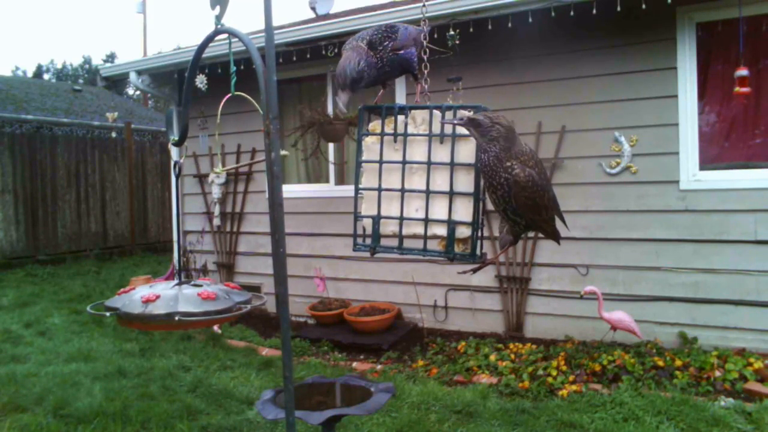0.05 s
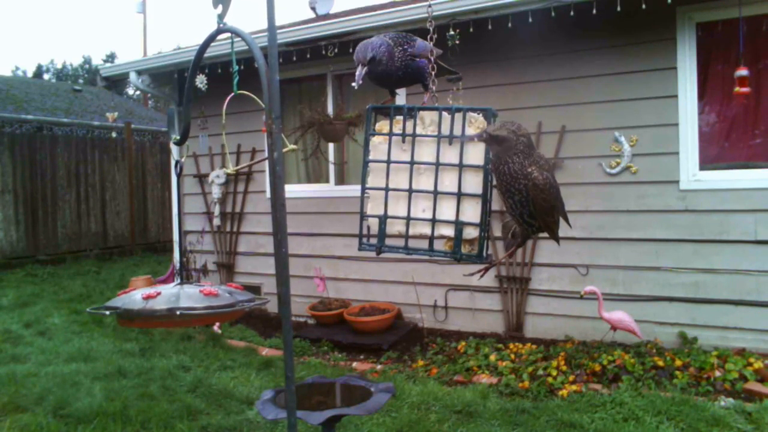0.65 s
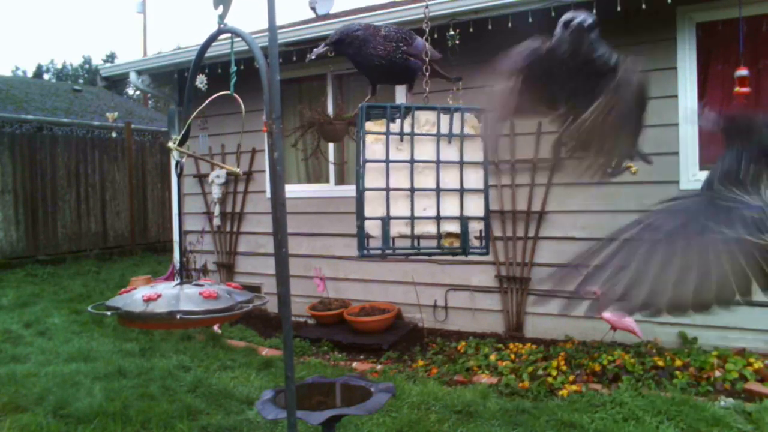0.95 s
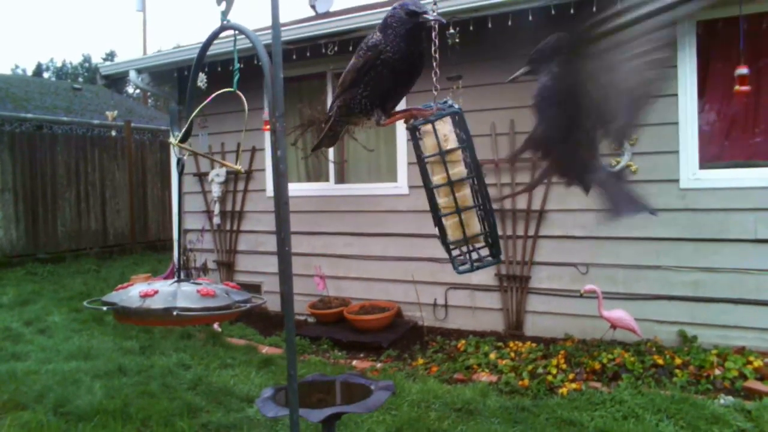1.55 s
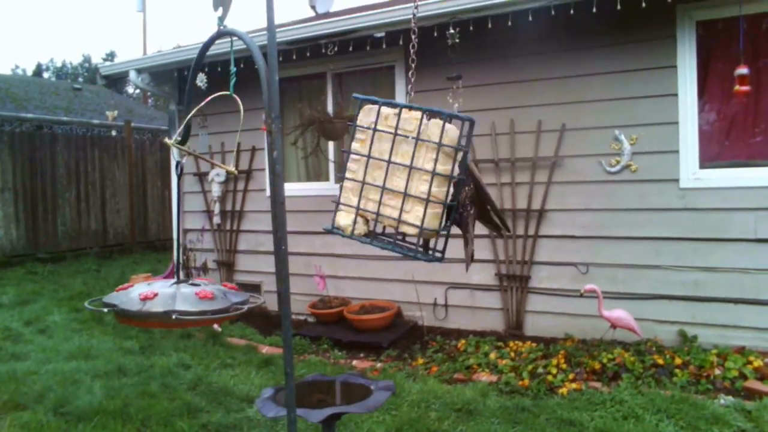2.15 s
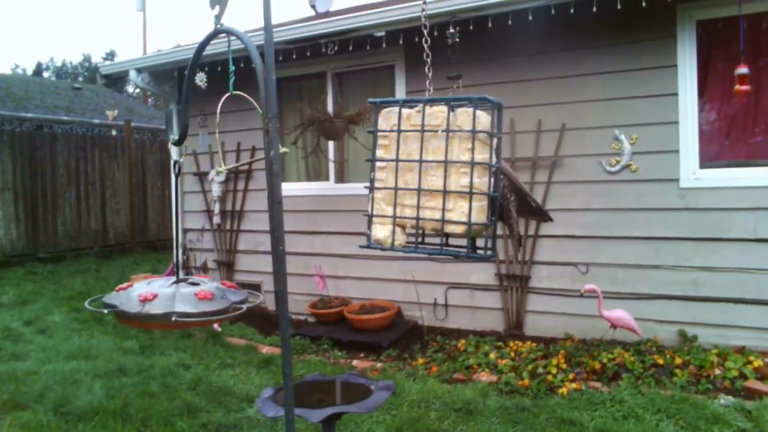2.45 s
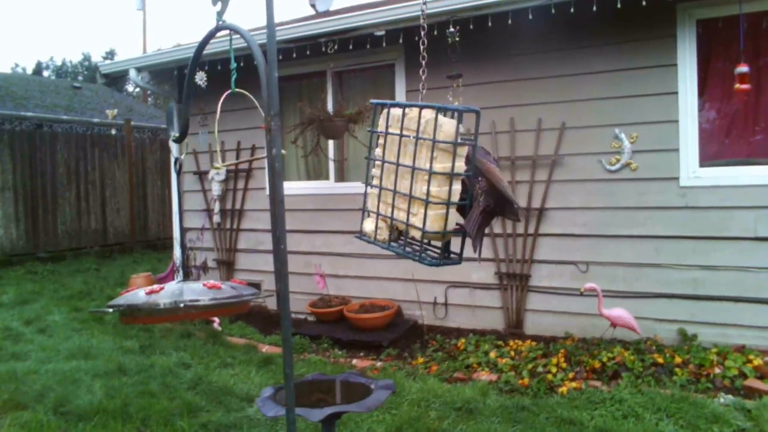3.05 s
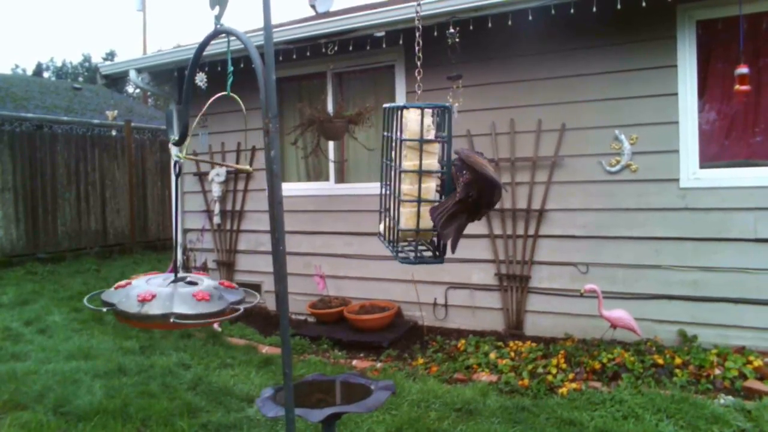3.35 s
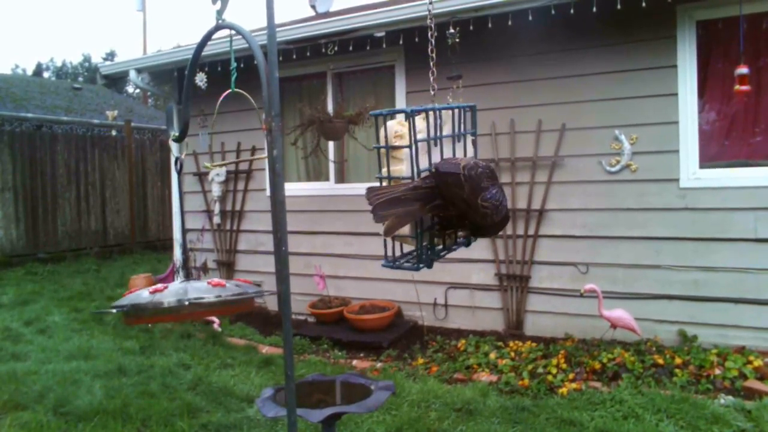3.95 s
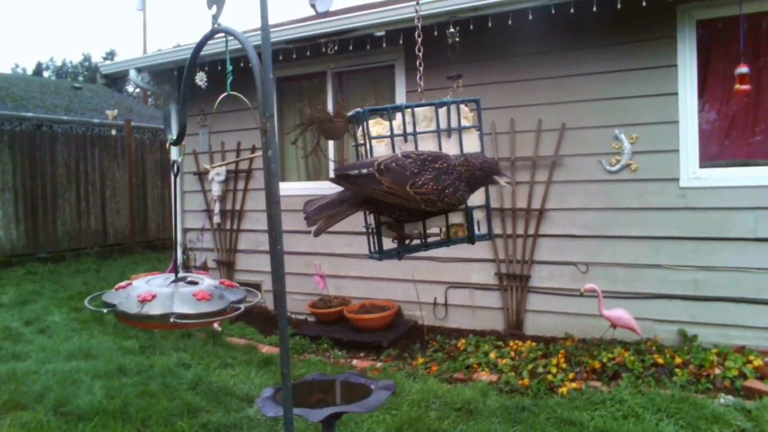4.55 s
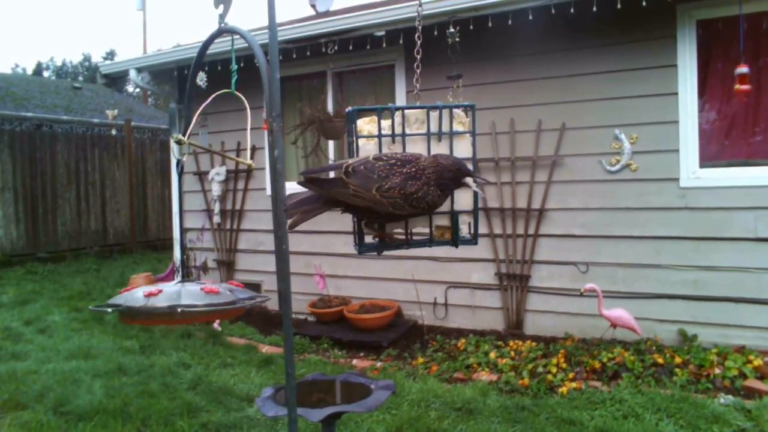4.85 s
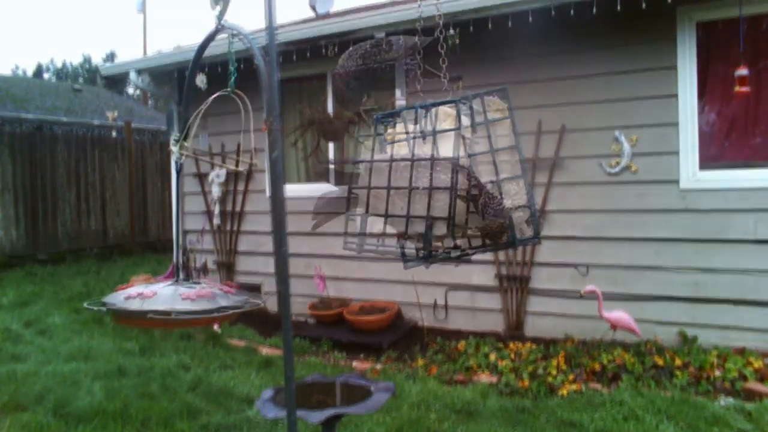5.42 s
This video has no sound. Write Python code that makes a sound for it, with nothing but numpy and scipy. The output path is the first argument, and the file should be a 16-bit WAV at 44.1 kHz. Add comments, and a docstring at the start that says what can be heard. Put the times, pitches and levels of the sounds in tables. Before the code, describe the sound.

A dull hum and faint hiss fill a garden. At about 0.5 seconds a starling close by gives a raspy, warbling squeal, rising into two louder short ones around 1 second, with flapping and taps on a wire feeder. At 1.1 seconds wings thump air against the microphone, followed by a loud clack, claw scrapes and another hoarse squeal at 1.3. A sharp knock and scrape come near 1.9 seconds, then more flapping and a second heavy gust at 2.3. Claws tick lightly on the wire around 2.6. Small wings whirr softly near 3 seconds. From 3.2 to 3.8 a bird slightly farther off gives six sharp, falling chips with a little echo, and one more at 4.3, among light ticks and taps. Feathers rustle faintly near 5 seconds, and a last knock and scrape sound at about 5.5 as the background fades.

```python
"""A garden by a house wall, where starlings squabble at a hanging wire suet cage near a small camera.
Their squeals are whistles under fast frequency modulation, with a rasp of turbulent air. Beaks and
claws knock and scrape, exciting the modes of the cage, and tick on its wire; wings rustle and shed
vortices onto the microphone. Later small wings whirr, and a bird's sharp falling chips reflect
off the wall. A dull hum and a faint hiss lie under it all."""
import sys
import numpy as np
from scipy import signal
from scipy.fft import rfft, irfft, next_fast_len
from scipy.io import wavfile
from scipy.ndimage import uniform_filter1d

SR = 44100
rng = np.random.default_rng(int(sys.argv[2]) if len(sys.argv) > 2 else 0)


def file_out(sig):
    """Save sig as 16-bit WAV at sys.argv[1]."""
    # one column per channel
    cols = np.atleast_2d(sig).T
    # limit, then scale
    lim = np.clip(cols, -1, 1)
    pcm = np.round(lim * 32767).astype(np.int16)
    wavfile.write(sys.argv[1], SR, pcm)


N = 246078
T = np.arange(N) / SR


def from_db(db):
    """Amplitude ratio of a level in decibels."""
    return 10 ** (np.asarray(db) / 20)


def rms_one(x):
    """Normalisation to unit power."""
    return x / np.sqrt(np.mean(x ** 2) + 1e-20)


def butter(x, hz, kind="low", order=2):
    """Causal Butterworth low- or high-pass."""
    return signal.sosfilt(signal.butter(order, min(hz, .45 * SR), kind, fs=SR, output="sos"), x + 1e-18)


def noise(spectrum):
    """Spectral shaping of white noise by rows of (f/Hz, level/dB); unit power."""
    hz, db = np.transpose(spectrum)
    size = next_fast_len(N)
    f = np.arange(size // 2 + 1) * SR / size
    gain = from_db(np.interp(np.log(f + 1e-3), np.log(hz), db)) * (f < hz[-1]) * (f > hz[0] / 2)
    return rms_one(irfft(rfft(rng.standard_normal(size)) * gain, size)[:N])


def drift(hz):
    """Random modulation: low-passed noise of unit power."""
    return rms_one(butter(rng.standard_normal(N), hz))


def contact(size, bright_hz, low_hz):
    """Friction noise: micro-slips fill a band, their short-term power held even."""
    slips = butter(butter(rng.standard_normal(size), bright_hz), low_hz, "high")
    return slips / np.sqrt(uniform_filter1d(slips ** 2, size=SR // 700) + 1e-12)


def add(out, s, sound):
    """Superposition of a short sound, starting at time s."""
    at = max(round(s * SR), 0)
    out[at:at + len(sound)] += sound[:max(N - at, 0)]


def rubs(rows):
    """Sliding friction: bursts of contact noise under Gaussian envelopes."""
    out, t = np.zeros(N), T[:SR // 5] - .1
    for s, half_s, level_db, bright_hz, low_hz in rows:
        envelope = from_db(level_db) * np.exp(-(t / half_s) ** 2)
        add(out, s + t[0], envelope * contact(len(t), bright_hz, low_hz))
    return out


def wall(x, echo_db, scatter_db, delay_s=0.026, decay_s=0.025):
    """Reflection and scattering: one echo from the house wall, a diffuse tail from fence and ground."""
    t = T[:SR // 4]
    tail = rng.standard_normal(len(t)) * np.exp(-t / decay_s)
    scattered = signal.fftconvolve(x, tail / np.sqrt(np.sum(tail ** 2)))[:N]
    return x + from_db(echo_db) * np.interp(T - delay_s, T, x) + from_db(scatter_db) * scattered


# Spectrum of the garden hum: f/Hz, relative level/dB
HUM_SPECTRUM = [(15, -30.5), (25, -5), (86, -9.5), (174, -16), (195, -15), (256, -19.5), (335, -22.5),
                (392, -20.5), (429, -20.5), (470, -24.5), (630, -20.5), (1080, -22.5), (2040, -41.5),
                (5500, -58), (7150, -83), (12100, -120)]

def garden(hum_db=-44.5, hiss_db=-57.5):
    """Stationary ambient noise: a dull hum and a faint hiss."""
    hum = from_db(hum_db) * noise(HUM_SPECTRUM)
    return hum + from_db(hiss_db) * rms_one(butter(rng.standard_normal(N), 4500))


# Spectra of moving air and of feathers: f/Hz, relative level/dB
DRAUGHT_SPECTRUM = [(15, -8), (28, 8.5), (60, -7.5), (110, -13), (220, -23.5), (500, -38.5), (1500, -65.5)]
FEATHER_SPECTRUM = [(150, -0.5), (500, 3), (1000, 1), (2000, 0), (3200, -5), (4500, 3), (5500, -2)]
# Flurries of wings: peak t/s, half length/s, draught level/dB, rustle level/dB
FLURRIES = [(0.43, 0.053, -62, -53.5), (.72, 0.22, -44, -49), (1.098, 0.41, -14, -40.5),
            (2.06, .19, -25.5, -46.5), (2.293, 0.17, -20, -61.5), (2.924, 0.41, -34.5, -54),
            (3.663, 0.26, -45.5, -65.5), (4.73, 0.069, -53.5, -60.5), (5.024, 0.096, -49.5, -58)]

def flurries(breeze_db=-58.5, reach=0.46, draught_gain_db=-1.5, rustle_gain_db=6.0, ruffle_db=4.0):
    """Friction and turbulence: feathers rustle through each flurry, moving air rumbles near its peak."""
    air, feathers = from_db(breeze_db), 0
    for s, half_s, draught_db, rustle_db in FLURRIES:
        away = np.abs(T - s) / half_s
        air = air + from_db(draught_db) * np.exp(-away / reach)
        feathers = feathers + from_db(rustle_db) * np.exp(-away ** 2)
    draught = air * from_db(draught_gain_db) * noise(DRAUGHT_SPECTRUM)
    rustle = feathers * from_db(rustle_gain_db + ruffle_db * drift(68)) * noise(FEATHER_SPECTRUM)
    return draught + rustle


def whirr(from_s=2.917, to_s=3.18, attack_s=0.075, release_s=0.048, beat_hz=41.7, level_db=-42):
    """Periodic forcing: small hovering wings hum at their beat rate, which also modulates their swish."""
    beat = np.cos(2 * np.pi * beat_hz * T)
    swish = from_db(1) * (1 + .5 * beat) * butter(noise(FEATHER_SPECTRUM), 3000, "high")
    envelope = np.exp(-np.maximum(from_s - T, 0) / attack_s - np.maximum(T - to_s, 0) / release_s)
    return from_db(level_db) * envelope * (np.sqrt(2) * beat + swish)


# Runs of wing flaps: first t/s, length/s, level/dB
FLAP_RUNS = [(.665, .4, -31.5), (1.365, .09, -26.5), (2.022, .15, -38.5)]

def flaps(period_s=.063, half_s=0.0065, bright_hz=1300, low_hz=250):
    """A periodic train of dull noise pulses: feathers slap the air and each other."""
    return rubs([(s, half_s, db, bright_hz, low_hz) for first_s, length_s, db in FLAP_RUNS
                 for s in np.arange(first_s, first_s + length_s, period_s)])


# Hard wing strokes: t/s, half length/s, level/dB, eddy f/Hz, lead of the air pushed ahead/s
HARD_STROKES = [(1.103, 0.0055, -2.5, 248.3, .031), (2.279, 0.006, -2.5, 242, .017)]

def gusts(bow_s=.008, bow_db=-10, bow_hz=51.6, lag_s=.015, wake_s=0.012, wake_db=-9, wake_hz=104.6):
    """Air displacement: a hard stroke makes three puffs, the bow of air ahead, the vortex and its wake."""
    puffs = []
    for s, half_s, db, hz, lead_s in HARD_STROKES:
        bow = (s - lead_s, bow_s, db + bow_db, bow_hz)
        wake = (s + lag_s, wake_s, db + wake_db, wake_hz)
        puffs += [bow, (s, half_s, db, hz), wake]
    return puffs


# Softer wing strokes: t/s, half length/s, level/dB, eddy f/Hz
SOFT_STROKES = [(1.238, 0.003, -8, 144), (2.08, .014, -19, 39.4), (2.13, 0.014, -24.5, 40.3)]

def buffets(wander=0.22, eddy_db=-3.0, eddy_reach=2.57, onset=2.9, release=1.02):
    """Vortex shedding: each stroke gives the microphone a sudden pressure swing with finer turbulence."""
    out, t = np.zeros(N), T[:SR // 5] - .1
    for s, half_s, level_db, hz in SOFT_STROKES + gusts():
        unsteady = rms_one(butter(rng.standard_normal(len(t)), hz, order=3))
        eddies = rms_one(butter(rng.standard_normal(len(t)), hz * eddy_reach, order=3))
        turns = np.cumsum(hz * (1 + wander * unsteady)) / SR
        swing = -np.sqrt(2) * np.cos(2 * np.pi * (turns - turns[len(t) // 2]))
        envelope = 1 / np.cosh(np.where(t < 0, onset, release) * t / half_s)
        add(out, s + t[0], from_db(level_db) * envelope * (swing + from_db(eddy_db) * eddies))
    return out


# Claw tips touching the wire: t/s, level/dB
TICKS = [(0.249, -49), (1.712, -26.5), (1.8267, -24), (2.6007, -23.5), (2.626, -17), (2.6623, -30),
         (2.7033, -25.5), (3.7399, -20.5), (3.9669, -26), (2.018, -24), (5.4302, -30)]

def ticks(gain_db=4.0, decay_s=0.00054, bright_hz=6000, edge_hz=3200):
    """Light impacts: so brief a contact has a spectrum that reaches far into the treble."""
    out, t = np.zeros(N), T[:SR // 100]
    for s, level_db in TICKS:
        envelope = from_db(level_db + gain_db) * np.exp(-t / decay_s)
        add(out, s, envelope * contact(len(t), bright_hz, edge_hz))
    return butter(out, edge_hz, "high", order=3)


# Claw scrapes: peak t/s, half length/s, level/dB, lower edge f/Hz
SCRAPES = [(1.21, 0.008, -24, 605), (1.245, 0.0065, -19.5, 400), (1.335, 0.0049, -20, 2470),
           (1.356, 0.003, -22, 2520), (1.922, 0.011, -15.5, 1020), (2.584, 0.0027, -38.5, 1200),
           (2.644, 0.0075, -38.5, 1190), (2.72, 0.014, -37.5, 1160), (5.057, 0.005, -37.5, 1210),
           (5.498, 0.0078, -20, 985)]

def scrapes(drag_db=-11, drag_hz=1900, slide_hz=8500, brightening=.22, grain_db=4.0):
    """Stick-slip friction: a claw drags dully, then slides fast; the harder the slide, the brighter."""
    drags, slides = [], []
    for s, half_s, db, low_hz in SCRAPES:
        drags.append((s - 1.9 * half_s, 2 * half_s, db + drag_db, drag_hz, low_hz))
        slides.append((s, half_s, db, slide_hz * from_db(brightening * db), low_hz))
    return rubs(drags + slides) * from_db(grain_db * drift(380))


# Hard knocks on the cage: t/s, level/dB, rattle decay/s, upper edge f/Hz, lower edge f/Hz
KNOCKS = [(0.854, -10.5, 0.0027, 2600, 197), (.884, -13, 0.0017, 2430, 300), (.924, -6, 0.00049, 5930, 795),
          (.96, -16, 0.0037, 4980, 499), (1.1616, 0, 0.0055, 4860, 409), (1.167, -2, .004, 5820, 400),
          (1.337, -12.5, 0.0012, 5900, 1500), (1.392, -14.5, 0.0026, 1890, 1000),
          (1.854, 3, 0.0016, 4400, 300), (4.087, -28.5, 0.0012, 1660, 1010),
          (4.1438, -19.5, 0.0089, 2620, 1238), (4.151, -18, 0.0066, 2036, 1237),
          (5.4516, -7, 0.0041, 1720, 745)]

def knocks(push_db=-8.0, push_s=0.00045, shudder_db=-24, shudder_s=.016):
    """Impulsive excitation: a brief push, a decaying rattle and a longer shudder of the cage."""
    force, t = np.zeros(N), T[:SR // 10]
    push = from_db(push_db) * t / push_s * np.exp(1 - t / push_s)
    for s, level_db, rattle_s, bright_hz, low_hz in KNOCKS:
        rattle = np.exp(-t / rattle_s) * contact(len(t), bright_hz, low_hz)
        shudder = np.exp(-t / shudder_s) * contact(len(t), bright_hz=1900, low_hz=680)
        add(force, s, from_db(level_db) * (push + rattle + from_db(shudder_db) * shudder))
    return force


# Normal modes of the feeder: f/Hz, level/dB, T60/s
FEEDER_MODES = [(195, -24, 0.23), (480, -16, 0.06), (770, -14.5, 0.025), (920, -13, 0.026),
                (1112, -16, 0.056), (1546, -12.5, 0.023), (1847, -14, 0.021), (2128, -13.5, 0.059),
                (2920, -27.5, 0.12), (3400, -22.5, 0.011), (3926, -13.5, 0.032), (4340, -4, 0.012),
                (4900, 2.5, 0.0079), (5090, -0.5, 0.0037)]

def feeder(force, direct_db=-2.5, ring_db=-27.0, hollow_hz=3000, hollow_q=5.8):
    """Modal resonance: contact force drives damped modes and is also heard directly, through a notch."""
    force = butter(force, 200, "high") + 1e-18
    out = from_db(direct_db) * signal.lfilter(*signal.iirnotch(hollow_hz, hollow_q, fs=SR), force)
    for hz, level_db, t60 in FEEDER_MODES:
        radius, angle = from_db(-60 / (t60 * SR)), 2 * np.pi * hz / SR
        pole_real = radius * np.cos(angle)
        ring = signal.lfilter([1, -pole_real], [1, -2 * pole_real, radius ** 2], force)
        out += from_db(level_db + ring_db) * ring
    return out


# Falling chips: t/s, level/dB, f/Hz after the plunge, length/s
CHIPS = [(3.221, -20, 1640, 0.0055), (3.4228, -27, 1685, 0.023), (3.5208, -25, 1735, 0.017),
         (3.612, -26.5, 1740, 0.013), (3.718, -26, 1780, 0.019), (3.8154, -26.5, 1794, 0.026),
         (4.315, -24, 2240, 0.013)]

def chips(start_hz=6000, fall_s=0.0043, sag_hz_per_s=13000, attack_s=.0024, fade_s=0.0022, held=0.28):
    """Frequency sweep: each chip plunges within milliseconds; harmonics grow as it settles and sags."""
    out, t = np.zeros(N), T[:SR // 16]
    shape = np.minimum(t / attack_s, 1) ** 2 * (held + np.exp(-np.maximum(t - attack_s, 0) / fade_s))
    for s, level_db, end_hz, length_s in CHIPS:
        plunge_hz = (start_hz - end_hz) * np.exp(-(t / fall_s) ** 1.59)
        hz = end_hz + plunge_hz - sag_hz_per_s * np.minimum(t, 2 * length_s)
        phase = 2 * np.pi * np.cumsum(hz) / SR
        overtones = from_db(-5) * np.sin(2 * phase) + from_db(-12) * np.sin(3 * phase)
        tone = np.sin(phase) + np.minimum(end_hz / hz, 1) * overtones
        add(out, s, from_db(level_db) * shape * np.exp(-(t / length_s) ** 3) * tone)
    return out


# Spectrum of the air in a squeal: f/Hz, relative level/dB
RASP_SPECTRUM = [(300, -25), (900, -20.5), (1300, -7), (1750, 2), (2500, 3), (3600, -10.5), (5500, -15.5)]
# Starling squeals: t/s, length/s, base f/Hz, arch height/Hz, time to its top/s, upward swing/Hz,
# initial warble rate/Hz, level/dB, swell over the call/dB, rasp level/dB
SQUEALS = [(-.03, 0.046, 2720, 4, .02, 250, 81, -41.5, -16, 0),
           (0.55, 0.36, 2093, 800, .125, 1251, 80.4, -28.5, 8, -2),
           (0.887, .09, 2265, -2, .045, 1987, 64, -21, 6, -15),
           (0.998, 0.051, 2615, 4, .03, 2010, 69, -17, 7.5, -13),
           (1.3, .194, 1991, 820, .095, 1055, 82, -24.5, -6, -1)]

def squeals(scoop_hz=448.8, scoop_s=0.022, arch_s=0.063, attack_s=0.0063, slowing=.33, jitter=0.028):
    """Frequency modulation: a rasping whistle is thrown upward some sixty times a second, unevenly."""
    out, waver = np.zeros(N), drift(350)
    flicker_db, rasp = 6 * np.tanh(drift(290)), noise(RASP_SPECTRUM)
    stumble, reach = .22 * drift(70), 1 + .2 * np.tanh(drift(90))   # warbles vary in timing and width
    for s, length_s, base_hz, arch_hz, top_s, swing_hz, rate_hz, call_db, swell_db, hoarse_db in SQUEALS:
        t = np.clip(T - s, 0, length_s)
        progress = t / length_s
        envelope = uniform_filter1d((progress < 1) * (1 - np.exp(-t / attack_s)), size=180)
        push_db = swell_db * (progress - .5)
        gain = from_db(call_db + push_db)
        arch = np.exp(-((t - top_s) / arch_s) ** 2)
        low_hz = base_hz - scoop_hz * np.exp(-t / scoop_s) + arch_hz * arch   # starts flat, then arches
        warble = np.pi * rate_hz * t * (1 - slowing * progress / 2) + stumble
        throw = 1 - np.abs(np.sin(warble)) ** .96   # round troughs, pointed tops
        hz = low_hz + swing_hz * from_db(.38 * push_db) * reach * throw   # wider when louder
        phase = 2 * np.pi * np.cumsum(hz * (1 + jitter * waver)) / SR
        strain = from_db(-4) * np.sqrt(gain)   # pushed harder, the tone turns harsh
        whistle = np.sqrt(2) * (np.sin(phase) + strain * np.sin(2 * phase))
        effort_db = -.5 - 4 * throw - 2 * np.sin(2 * warble)   # strongest as the pitch starts to rise
        rasp_db = hoarse_db - 10 * (1 - np.sin(np.pi * progress))   # hoarsest in mid-call
        voice = from_db(effort_db + flicker_db) * whistle + from_db(rasp_db) * rasp
        out += gain * envelope * voice
    return out


def scene(right_db=0.6, fade_from_s=5.01, fade_db_per_s=10):
    """Superposition: near sounds are almost dry and a little to the right; the farther chips echo more."""
    near = squeals() + feeder(scrapes() + knocks()) + ticks() + flaps()
    near = wall(near, echo_db=-37.5, scatter_db=-23.5)
    far = wall(chips(), echo_db=-15.0, scatter_db=-10.5)
    ambience, buffeting = garden(), buffets()
    background = ambience + flurries() + whirr()
    fade = from_db(-fade_db_per_s * np.maximum(T - fade_from_s, 0))
    pan = from_db(right_db * np.array([[-.5], [.5]]))
    return background * fade + buffeting + far + near * pan


def record(dry, step=4, overload=.94, soften_hz=11500, cutoff_hz=16000):
    """Spectral imaging: the camera overloads at a quarter rate; interpolation mirrors sound upward."""
    coarse = np.clip(butter(dry, 5800, order=8)[:, ::step], -overload, overload)
    joined = np.array([np.interp(np.arange(N), np.arange(0, N, step), side) for side in coarse])
    softened = butter(joined, soften_hz, order=1)
    return signal.sosfilt(signal.ellip(10, .1, 70, cutoff_hz, fs=SR, output="sos"), softened)


dry = scene()
out = record(dry)
file_out(out)
```